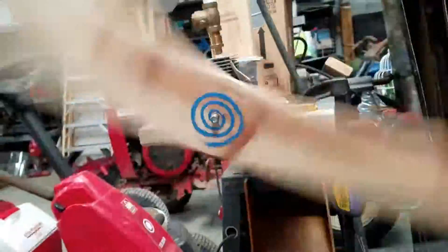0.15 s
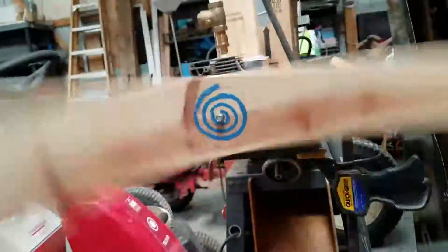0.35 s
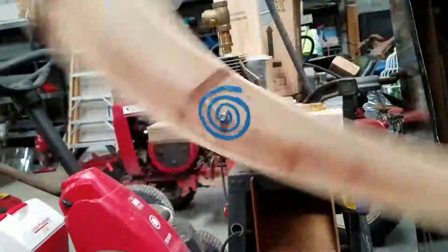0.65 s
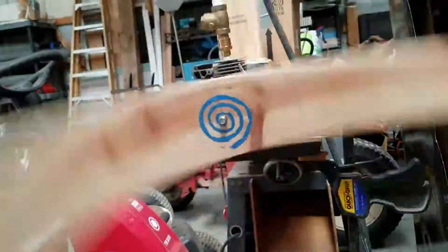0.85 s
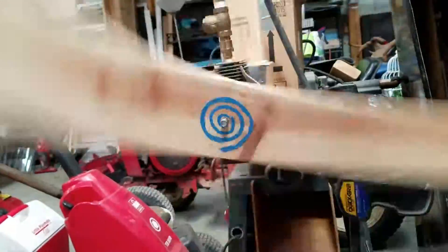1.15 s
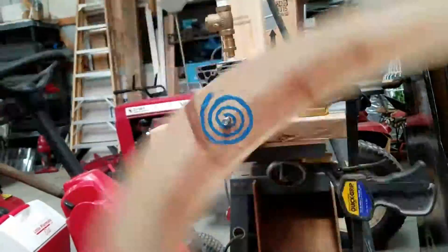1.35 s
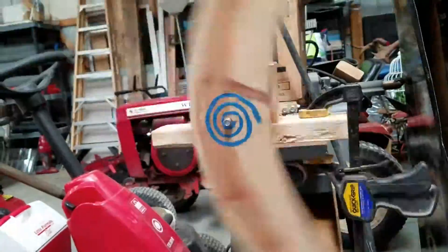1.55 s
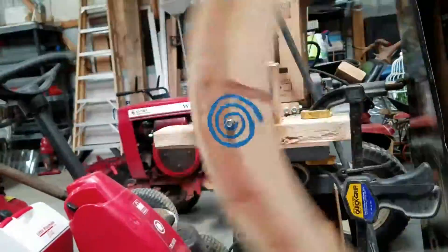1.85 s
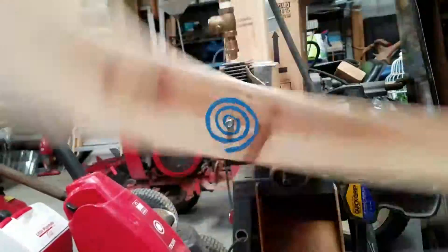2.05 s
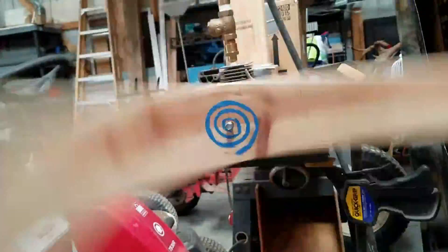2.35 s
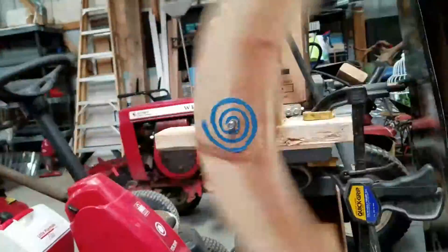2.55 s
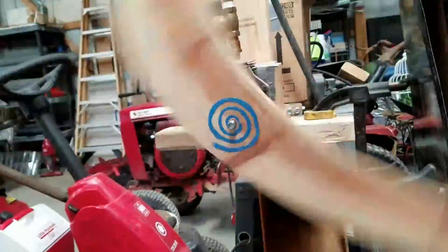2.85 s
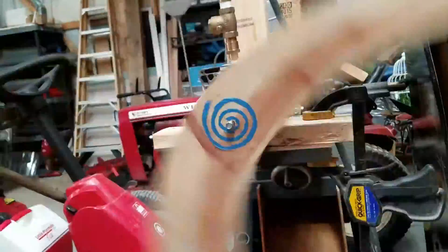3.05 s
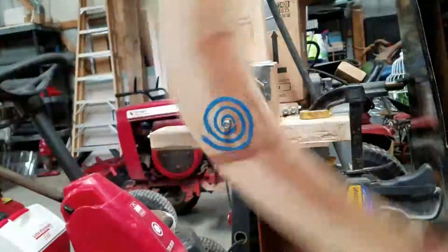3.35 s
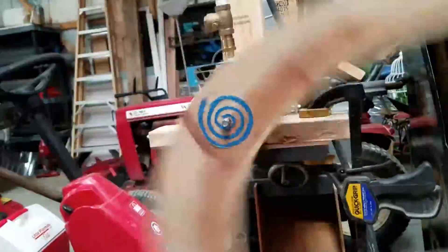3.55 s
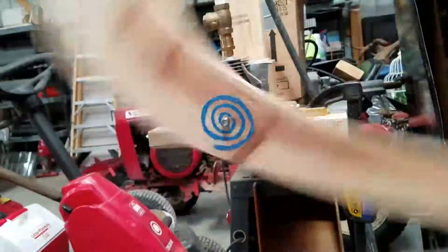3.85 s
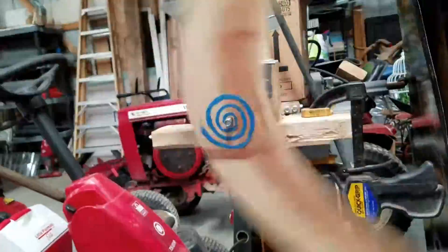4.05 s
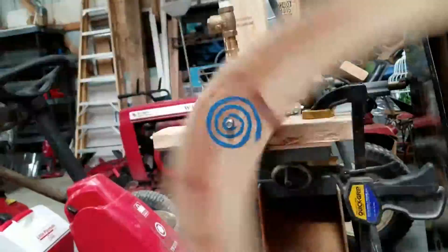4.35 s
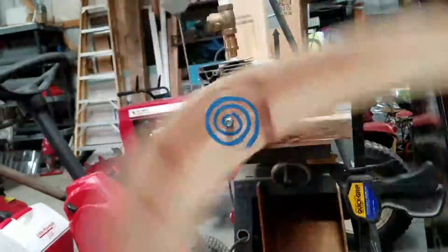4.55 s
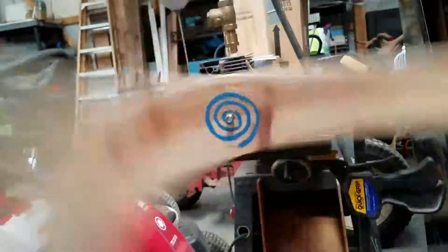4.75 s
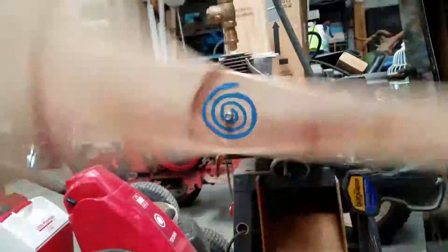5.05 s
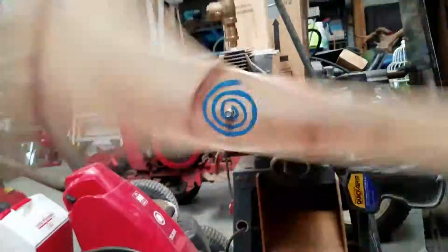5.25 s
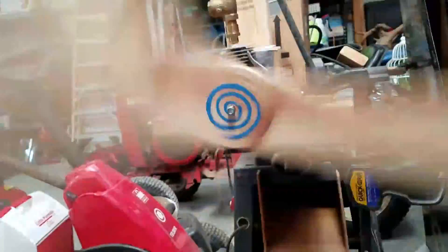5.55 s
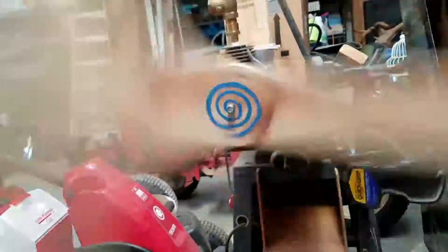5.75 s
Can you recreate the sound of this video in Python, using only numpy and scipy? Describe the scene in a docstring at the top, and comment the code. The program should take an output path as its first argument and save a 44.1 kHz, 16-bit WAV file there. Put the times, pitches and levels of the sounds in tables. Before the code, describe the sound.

Rhythmic clacking and puffing come from a little air-driven engine, near the microphone and slightly to the left, in a mildly reverberant garage. It starts at about three beats a second, with small ticks and rattles between them, and gathers speed to about five. The knocking grows stronger toward the middle, then sharp, hissing exhaust chuffs take over, while the bench rumbles faintly throughout.

```python
"""A small home-made compressed-air engine with a wooden flywheel gathers speed in a cluttered garage.
At fixed crank angles the inlet leaks, the piston clacks on the valve, the exhaust puffs and the crank
knocks. Impacts excite damped modes; escaping air radiates turbulent noise. At speed the clack softens
and the exhaust becomes a sharp blast. The bench rumbles throughout and the room reverberates."""
import sys
import numpy as np
from scipy import signal
from scipy.fft import rfft, irfft, next_fast_len
from scipy.io import wavfile
from scipy.ndimage import map_coordinates

SR = 44100
rng = np.random.default_rng(int(sys.argv[2]) if len(sys.argv) > 2 else 0)


def store_pcm(level_fs):
    """Save levels as 16-bit WAV."""
    pcm = np.round(np.clip(level_fs, -1, 1) * 32767).astype(np.int16)
    wavfile.write(sys.argv[1], SR, np.atleast_2d(pcm).T)


N = 260190
AGE = np.arange(SR // 2) / SR  # time since an event began [s]
FIRST_CLACK_S, SLOW_TO_FAST_S = 0.28, (3.56, 3.72)
# crank angles [turns after the clack]
LEAK_TURN, BOUNCE_TURN, TAP_TURN, OPEN_TURN = -0.145, 0.125, 0.248, 0.263
PUFF_TURN, KNOCK_TURN, TICK_TURN = 0.303, 0.446, 0.638

# flywheel speed: (time [s], rate [turns/s])
SPEED = [(0, 2.83), (0.3, 2.955), (0.78, 3.024), (2, 3.438), (3.3, 3.967), (4.2, 4.506), (5.6, 5.129),
         (5.9, 4.99)]
# force of the piston on the valve: (time [s], level [dB])
CLACK_LEVEL = [(0.28, -24.5), (0.61, -27.5), (1.05, -21.5), (1.87, -20.5), (2.16, -24), (2.7, -22),
               (3.1, -17), (3.49, -18), (3.73, -25.5), (4.19, -27.5), (4.41, -32.5), (5.24, -33),
               (5.5, -28)]
# resonances of the exhaust passage: (frequency [Hz], width [Hz], level [dB])
PORT_RESONANCES = [(910, 15, -15), (1070, 36, 7), (1560, 270, -21), (2244, 37, 1.5), (2670, 66, -6),
                   (2887, 130, -5), (3950, 85, -21.5)]
# left-right coherence of bench noise and air jets: (frequency [Hz], coherence [0-1])
BENCH_COHERENCE = [(60, 1), (250, 0.93), (800, 0.63), (3000, 0), (12000, 0)]
JET_COHERENCE = [(200, 0.84), (700, 0.9), (1500, 0.14), (4000, 0.3), (12000, 0.07)]


def amp(db):
    """Amplitude ratio of a level in decibels."""
    return 10 ** (np.asarray(db) / 20)


def at(s, curve):
    """Linear interpolation of a (time [s], value) curve."""
    return np.interp(s, *np.transpose(curve))


def along(points, hz):
    """Interpolation of (frequency [Hz], value) points on a logarithmic axis."""
    f, v = np.transpose(points)
    return np.interp(np.log(hz + 1), np.log(f), v)


def running(s, pair):
    """Transition between the values of a (slow running, fast running) pair."""
    return np.interp(s, SLOW_TO_FAST_S, pair)


def strokes(turn):
    """Angle is the integral of speed: the times at which the crank passes one angle."""
    t = np.arange(N) / SR
    angle = np.cumsum(at(t, SPEED)) / SR
    angle -= np.interp(FIRST_CLACK_S, t, angle) + turn
    return np.interp(np.arange(np.ceil(angle[0]), angle[-1]), angle, t)


def events(turn, levels):
    """One excitation per revolution: rows of (time [s], level [dB])."""
    return [(s, at(s, levels)) for s in strokes(turn)]


def filtered(x, response):
    """Filtering as multiplication of the spectrum by a frequency response."""
    size = x.shape[-1]
    padded = next_fast_len(size + SR // 10)
    return irfft(rfft(x, padded) * response(np.fft.rfftfreq(padded, 1 / SR)), padded)[..., :size]


def wobble(rate):
    """Smooth random modulation: a spline through rate knots a second."""
    return map_coordinates(rng.standard_normal(int(N * rate / SR) + 4), [np.arange(N) * rate / SR])


def mid_side(coherence, hz):
    """Coherence sets how power divides between the mid and side signals."""
    angle = np.arccos(np.clip(along(coherence, hz), -1, 1)) / 2
    return np.array([np.cos(angle), np.sin(angle)])


def noise(spectrum, coherence, resonances=()):
    """Source and filter: stereo noise of rms 1, shaped by a spectrum and Lorentzian peaks."""
    def response(hz):
        peaks = sum(amp(db) / (1 + (2 * (hz - centre) / width) ** 2) for centre, width, db in resonances)
        return amp(along(spectrum, hz)) * (1 + peaks) * mid_side(coherence, hz)
    mid, side = filtered(rng.standard_normal((2, N)), response)
    stereo = np.array([mid + side, mid - side])
    return stereo / np.sqrt(np.mean(stereo ** 2) + 1e-20)


def add(track, s, sound):
    """Superposition of a sound on a track at time s."""
    part = track[..., max(round(s * SR), 0):][..., :sound.shape[-1]]
    part += sound[..., :part.shape[-1]]


def burst(rise, hold, t60):
    """An envelope that rises, holds and decays exponentially."""
    return (1 - np.exp(-(AGE / rise) ** 2)) * np.exp(-np.log(1000) * np.maximum(AGE - hold, 0) / t60)


def bursts(rows):
    """Incoherent bursts add in power: rows of (time [s], level [dB], rise [s], hold [s], t60 [s])."""
    power = np.zeros(N)
    for s, db, rise, hold, t60 in rows:
        add(power, s, (amp(db) * burst(rise, hold, t60)) ** 2)
    return np.sqrt(power)


def ring(modes, hold, scatter_db, spread):
    """Modal response to one blow: damped sines of random strength, with a phase for each channel."""
    out = np.zeros((2, len(AGE)))
    for (hz, db, t60), (size, left, right) in zip(modes, rng.standard_normal((len(modes), 3))):
        phase = 2 * np.pi * (hz * AGE + rng.random())
        offset = spread * hz / modes[-1][0] * np.array([[left], [right]])
        out += amp(db + scatter_db * size) * burst(0.0005, hold, t60) * np.sin(phase + offset)
    return out


def shaft():
    """Forced vibration and friction: the flywheel shakes the bench, the shaft rubs in its bearings."""
    # strength of the rumble: (time [s], level [dB])
    rumble_level = [(0.1, -45), (1.08, -47.5), (2.52, -45.5), (3.48, -42.5), (3.85, -49.5), (4.31, -50.5),
                    (5.4, -48.3)]
    # noise spectra: (frequency [Hz], relative density [dB])
    rumble_spectrum = [(15, -45), (25, -24), (80, 1), (167, 3), (284, -6.5), (344, -9), (391, -3),
                       (420, -4.5), (550, -59), (920, -120)]
    rub_spectrum = [(200, -7.5), (450, -2.5), (800, -4), (1150, -6.5), (1900, -6.5), (2600, -8),
                    (4000, -14), (6000, -20), (10000, -13), (16000, -15.5)]
    rumble_db = at(np.arange(N) / SR, rumble_level) + 1.5 * wobble(25)
    rumble = amp(rumble_db) * noise(rumble_spectrum, BENCH_COHERENCE)
    rub = amp(-47 + 1.1 * wobble(45)) * noise(rub_spectrum, BENCH_COHERENCE, PORT_RESONANCES[:2])
    return rumble + rub


def exhaust():
    """Turbulent jets excite the passage: the port spits, opens, puffs and, at speed, blasts."""
    # strength of the airflow: (time [s], level [dB])
    spits = [(0.016, -23.5), (0.362, -25.5), (0.6953, -22.5)]  # single events at the lowest speeds
    opening_level = [(0.7, -32), (1.03, -24), (1.95, -24), (2.3, -29.5), (3.55, -24), (3.8, -33)]  # port cracking open
    puff_level = [(0.72, -25), (1.04, -22), (1.96, -22), (2.25, -19), (3.4, -19), (3.8, -23.5), (5.5, -26),
                  (5.7, -28)]  # port open
    drain_level = [(2.5, -56), (3.35, -38), (3.59, -22.5), (3.83, -37), (4.06, -29), (4.6, -31.5),
                   (4.93, -21), (5.53, -21), (5.72, -27.5)]  # after the blast
    # jet spectra: (frequency [Hz], relative density [dB])
    spit_spectrum = [(150, -17), (850, -5), (1600, -4.5), (2500, -3), (4300, -6.5), (5800, -17),
                     (7000, -12.5), (10000, -7.5), (13000, -6), (16000, -4.5)]
    puff_spectrum = [(180, -52), (300, -14.5), (478, -15.5), (645, -7), (1340, -13.5), (1530, -2),
                     (1870, -5), (2280, -1.5), (3460, -4.5), (4440, -4), (5520, -11), (10900, -6),
                     (12500, -4.5), (13500, -2), (16000, -5.5)]
    blast_spectrum = [(120, -47), (200, -8), (328, -24), (387, -11), (659, -8), (851, -12.5), (950, -36),
                      (1080, -16), (1180, -3), (1590, -4), (1980, -5), (2750, -3), (4600, -5.5),
                      (15100, -6), (16000, -8)]
    rasp_spectrum = [(500, -28), (1200, -18), (1550, -4), (1900, -6.5), (2400, 4.5), (3400, -3),
                     (4600, -7.5), (5600, -11), (7500, -17), (16000, -2)]
    throat_spectrum = [(200, -11), (500, -5.5), (800, -14), (1150, 4), (1300, -5), (1550, 5), (1950, -17),
                       (2300, 1.5), (2800, 5.5), (3500, -14.5), (6000, -15.5), (16000, -3.5)]
    # whistles of the barely open port: (frequency [Hz], width [Hz], level [dB])
    whistles = [(850, 130, 2), (2350, 130, 8), (3720, 140, 4), (4220, 190, 4), (6800, 320, 4),
                (8900, 300, 0), (11300, 350, 1)]
    puff_t60_s, rasp_over_puff_db = (0.17, 0.31), (-9, -19)
    full_blast_speed, blast_slope = 4.2, 27  # [turns/s], [dB per turn/s]
    puffs, ends = events(PUFF_TURN, puff_level), strokes(KNOCK_TURN)
    blast_db = -15 - blast_slope * np.maximum(full_blast_speed - at(ends, SPEED), 0)
    spit = bursts([(s, db, .003, .009, .07) for s, db in spits])
    spit = spit * noise(spit_spectrum, JET_COHERENCE, whistles)
    opening = [(s - .002, db, .005, .018, .18) for s, db in events(OPEN_TURN, opening_level)]
    puff = [(s, db, .003, .016, running(s, puff_t60_s)) for s, db in puffs]
    blast = [(s - .002, db, .004, .009, .05) for s, db in zip(ends, blast_db)]
    drain = [(s, at(s, drain_level), .008, .02, .3) for s in ends]
    hiss = bursts(opening + puff) * noise(puff_spectrum, JET_COHERENCE, PORT_RESONANCES[2:])
    hiss += bursts(blast + drain) * noise(blast_spectrum, JET_COHERENCE, PORT_RESONANCES)
    # with the port wide open, the remaining air rasps in the passage
    rasp = bursts([(s, db + running(s, rasp_over_puff_db), .002, .016, .08) for s, db in puffs])
    rasp = rasp * noise(rasp_spectrum, JET_COHERENCE)
    throat = bursts([(s + .0085, at(s, drain_level) + 1.5, .005, .014, .1) for s in ends])
    throat = throat * noise(throat_spectrum, JET_COHERENCE, PORT_RESONANCES)
    flutter = amp(1.8 * wobble(220))  # the jets shake as they leave the port
    return flutter * (hiss + spit) + amp(3.9 * wobble(260)) * (rasp + throat)


def crank():
    """Impacts at load reversal: the bearing taps, then knocks, and the bench takes a low thump."""
    # modes of crank and bearing: (frequency [Hz], level [dB], t60 [s])
    modes = [(330, -13.5, 0.016), (482, -24, 0.053), (593, -4.5, 0.023), (742.5, -9.5, 0.065),
             (852, -3.5, 0.094), (950, 2.5, 0.016), (1078, -3.5, 0.045), (1466, 0.5, 0.0096),
             (2600, -5.5, 0.034), (2880, -23, 0.055)]
    # force of the knock, and single rebounds near top speed: (time [s], level [dB])
    knock_level = [(0.7, -34), (1.4, -25.5), (2, -24), (2.83, -19.5), (3.1, -16), (3.6, -15.5), (4.06, -19),
                   (4.4, -25.5), (5.7, -25.5)]
    rebounds = [(4.949, -26.5), (5.152, -20.5), (5.354, -19), (5.552, -21)]
    # shudder of the bench: (frequency [Hz], relative density [dB])
    shudder_spectrum = [(30, -32), (55, -31), (80, 5), (120, -9), (170, -1), (300, -10.5),
                        (700, -25), (3000, -70)]
    bench_hz, plank_hz = 76, 736
    tap_db, thump_db = (-25, -30.5), (-35.5, -37)
    thump_share, usual_knock_db = 0.25, -22.5
    knocks = events(KNOCK_TURN, knock_level)
    thumps = [(s, running(s, thump_db) + thump_share * (db - usual_knock_db)) for s, db in knocks]
    out = np.zeros((2, N))
    for s in strokes(TAP_TURN):
        tap = ring(modes, hold=0.00042, scatter_db=3, spread=1.6) * burst(.0016, .0025, .04)
        add(out, s - .001, amp(running(s, tap_db)) * tap)
    for s, db in knocks + rebounds:
        add(out, s, amp(db) * ring(modes, hold=0.00028, scatter_db=1.5, spread=2.2))
    for s, db in rebounds:
        add(out, s, amp(db - 2.5) * burst(.0025, .004, .08) * np.sin(2 * np.pi * plank_hz * AGE))
    for s, db in thumps:
        add(out, s - .005, amp(db) * burst(.0019, .0088, .053) * np.sin(2 * np.pi * bench_hz * AGE))
    shudder = bursts([(s - .008, db - 3, .006, .012, .14) for s, db in thumps])
    return out + shudder * noise(shudder_spectrum, BENCH_COHERENCE)


def linkage():
    """Backlash: loose joints tick on the return stroke, then rattle and bounce after each clack."""
    # impact spectra: (frequency [Hz], relative density [dB])
    tick_spectrum = [(400, -16), (900, 6), (1300, 4.5), (1800, -6), (2300, 4), (3000, -17), (5000, -41),
                     (16000, -45)]
    rattle_spectrum = [(300, -3.5), (600, 1.5), (1000, 1), (1300, -3.5), (1600, 5.5), (1850, -12.5),
                       (2300, -10), (3200, -15), (5000, -20), (16000, -36)]
    tick_db, bounce_scatter_s = (-35.5, -51), 0.0045
    tick = bursts([(s, running(s, tick_db), .001, .006, .04) for s in strokes(TICK_TURN)])
    rattle = bursts([(s + .0047, db - 17, .008, .025, .22) for s, db in events(0, CLACK_LEVEL)])
    rattle *= amp(5.2 * wobble(130))
    bounce = bursts([(s + bounce_scatter_s * rng.standard_normal(), db - 15, .001, .004, .03)
                     for s, db in events(BOUNCE_TURN, CLACK_LEVEL)])
    return (tick * noise(tick_spectrum, BENCH_COHERENCE)
            + np.hypot(rattle, bounce) * noise(rattle_spectrum, BENCH_COHERENCE))


def inlet():
    """A turbulent leak swells as the piston rises, spurts as the valve is hit and then seeps on."""
    # thin hiss: (frequency [Hz], relative density [dB])
    leak_spectrum = [(2000, -32), (8000, -17), (10500, -6.5), (13000, 4.5), (16000, -2)]
    leak_db = (-39, -48)
    clacks = events(0, CLACK_LEVEL)
    swell = [(s - .008, running(s, leak_db), .012, .034, .12) for s in strokes(LEAK_TURN)]
    spurt = [(s, db - 17, .001, .004, .04) for s, db in clacks]
    seep = [(s, db - 29, .005, .07, .1) for s, db in clacks]
    return bursts(swell + spurt + seep) * noise(leak_spectrum, JET_COHERENCE)


def valve():
    """Impact excitation: the piston chatters briefly on the valve and rings the block."""
    # modes of the block on its plank: (frequency [Hz], level [dB], t60 [s])
    modes = [(379, -23.5, 0.22), (529, -21.5, 0.12), (611.6, -10.5, 0.054), (861, -13, 0.28),
             (939, -10.5, 0.053), (1064.4, 1, 0.058), (1120, -15, 0.1), (1239, -12, 0.046),
             (1316, -10.5, .04), (1502, -8.5, 0.016), (1592, -9.5, 0.045), (2068, -14, 0.045),
             (2310, -11, 0.052), (2600, -19, .04)]
    # contact noise: (frequency [Hz], relative density [dB])
    chatter_spectrum = [(150, -16), (350, -8), (600, 6.5), (1000, -0.5), (1550, 1.5), (1800, -12),
                        (2300, 1), (3000, -2.5), (5000, -12), (16000, -38)]
    click_spectrum = [(800, -8.5), (2200, 14), (3200, -1.5), (5000, -8), (6200, -21.5), (8400, -4),
                      (10300, -14), (12800, -14), (16000, -22)]
    click_db = (-26.5, -32)
    clacks = events(0, CLACK_LEVEL)
    block = np.zeros((2, N))
    for s, db in clacks:
        add(block, s - .001, amp(db) * ring(modes, hold=0.011, scatter_db=2, spread=1.58))
    chatter = bursts([(s - .002, db - 6, .002, .009, .04) for s, db in clacks])
    click = bursts([(s - .001, running(s, click_db), .0008, .004, .04) for s, _ in clacks])
    return (block + chatter * noise(chatter_spectrum, BENCH_COHERENCE)
            + click * noise(click_spectrum, JET_COHERENCE))


def clutter(x, echo_db, count=8):
    """Comb filtering: weak treble reflections from nearby boards and tools ripple the spectrum."""
    delays_s = rng.uniform(.001, .012, (2, count))
    echoes = [sum(np.pad(channel, (round(delay * SR), 0))[:N] for delay in row)
              for channel, row in zip(x, delays_s)]
    return x + amp(echo_db) * filtered(np.array(echoes), lambda hz: hz ** 2 / (hz ** 2 + 2000 ** 2))


def garage(x):
    """Diffuse reverberation, with a fresh random tail every fifth of a second; treble dies first."""
    # reverberation time: (frequency [Hz], t60 [s])
    decay_times = [(150, 0.99), (1000, 0.61), (3000, 0.58), (7000, 0.53), (15000, 0.23)]
    out = np.zeros((2, N))
    size = SR // 5
    for start in range(0, N, size):
        hz, t, spectra = signal.stft(rng.standard_normal((2, len(AGE))), SR, nperseg=256)
        decay = np.exp(-np.log(1000) * t / along(decay_times, hz)[:, None])
        spectra = spectra * decay * mid_side(BENCH_COHERENCE, hz[:, None])
        mid, side = signal.istft(spectra, SR)[1][:, :len(AGE)] * (1 - np.exp(-AGE / 0.0017))
        tail = np.array([mid + side, mid - side]) / np.linalg.norm(mid + side)
        add(out, start / SR, signal.fftconvolve(x[:, start:start + size], tail, axes=1))
    return out


def scene():
    """Direct and reflected sound superpose; the engine stands close by, a little to the left."""
    # stereo balance: (frequency [Hz], left over right [dB])
    balance = [(100, -2.5), (400, -0.5), (700, -1.5), (1200, 2.5), (2400, 2), (4400, 3), (8000, 3.5),
               (14000, 1.5)]
    blows = valve() + linkage() + crank()
    jets = clutter(inlet() + exhaust(), echo_db=-18)
    mix = blows + jets + garage(amp(-13.5) * blows + amp(-10) * jets) + shaft()
    return filtered(mix, lambda hz: amp(np.outer([.5, -.5], along(balance, hz))))


def record(dry):
    """A soft limiter rounds the loudest peaks; the deepest bass and highest treble are cut."""
    ceiling, low_hz, top_hz = 0.9, 36, 16000
    rounded = dry / (1 + (dry / ceiling) ** 4) ** (1 / 4)
    return filtered(rounded, lambda hz: hz ** 4 / (hz ** 4 + low_hz ** 4) * (hz < top_hz))


dry = scene()
out = record(dry)
store_pcm(out)
```